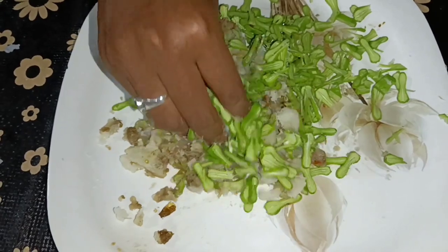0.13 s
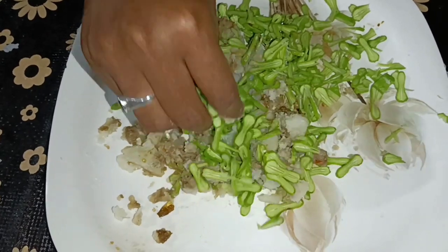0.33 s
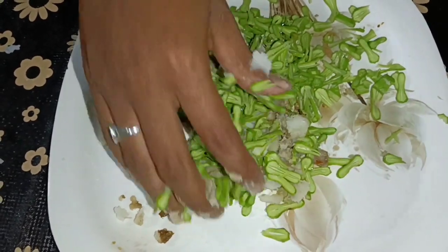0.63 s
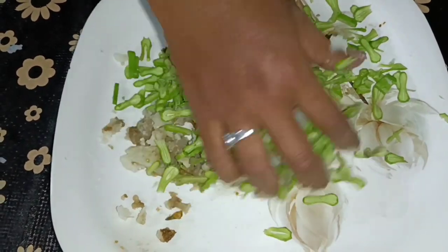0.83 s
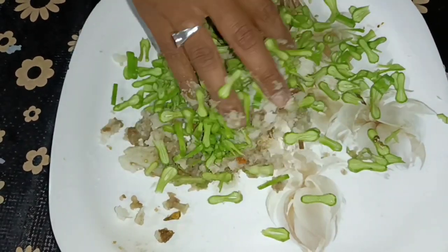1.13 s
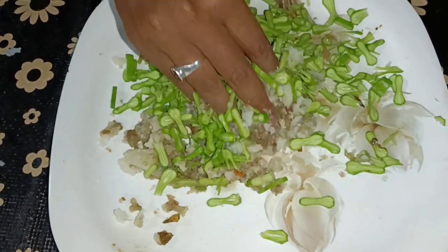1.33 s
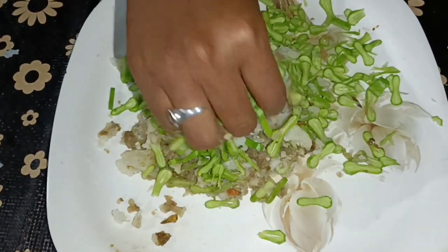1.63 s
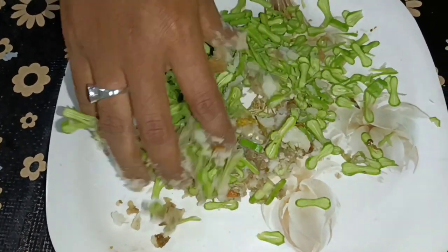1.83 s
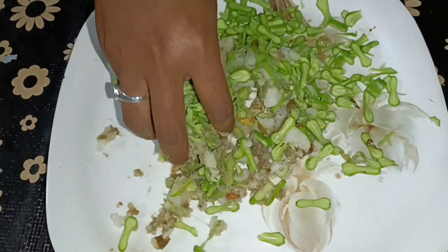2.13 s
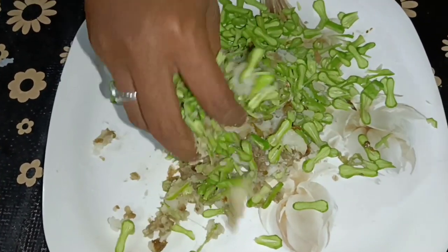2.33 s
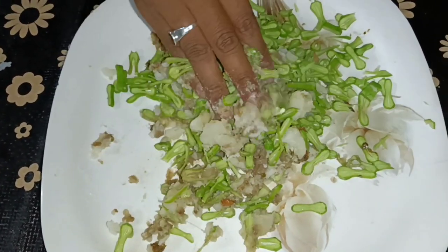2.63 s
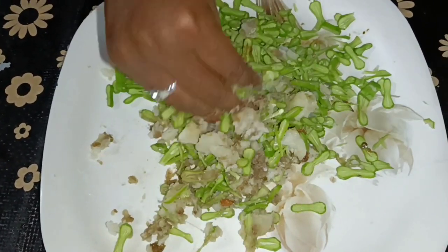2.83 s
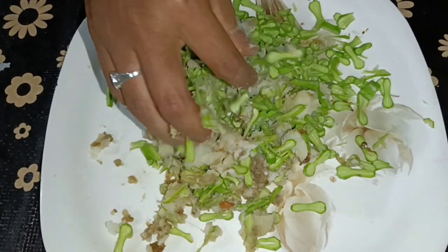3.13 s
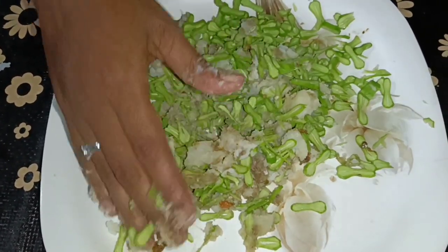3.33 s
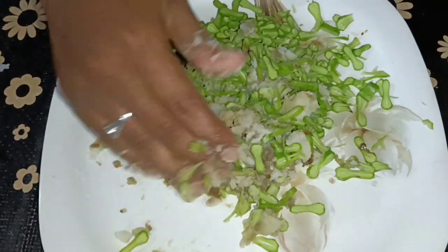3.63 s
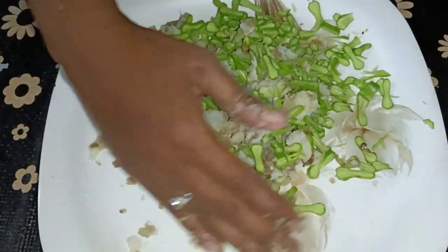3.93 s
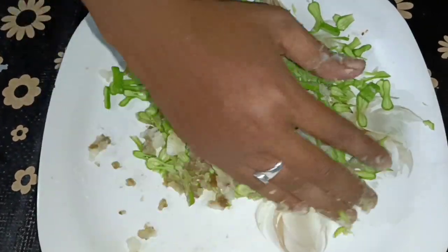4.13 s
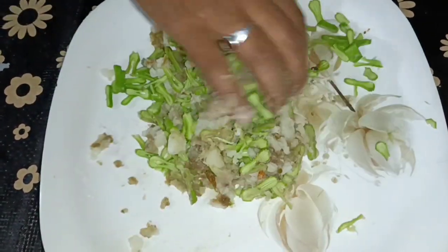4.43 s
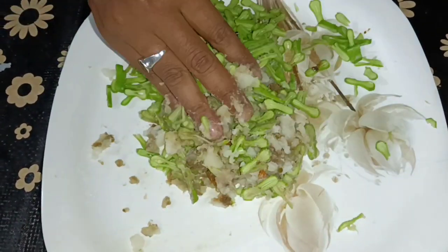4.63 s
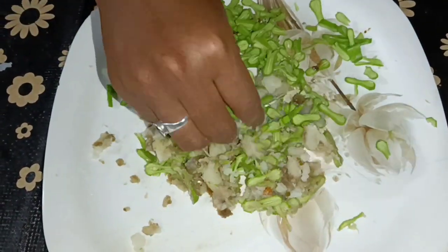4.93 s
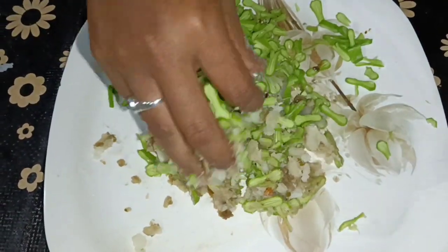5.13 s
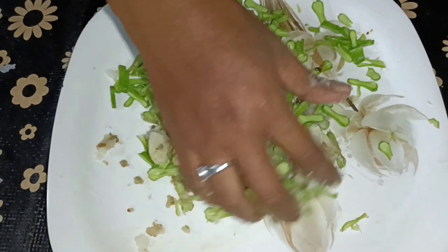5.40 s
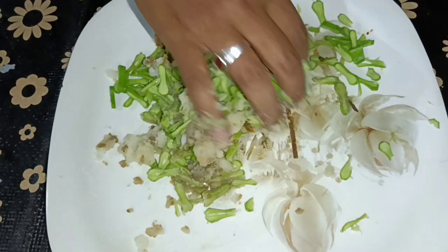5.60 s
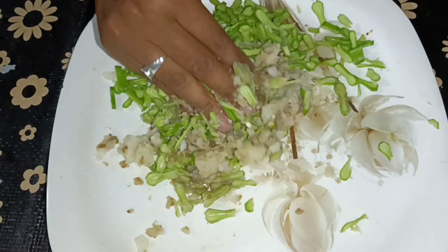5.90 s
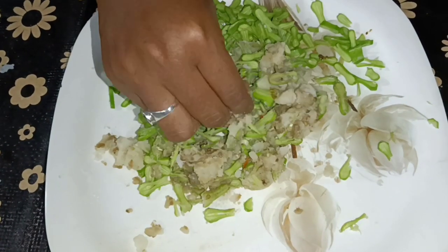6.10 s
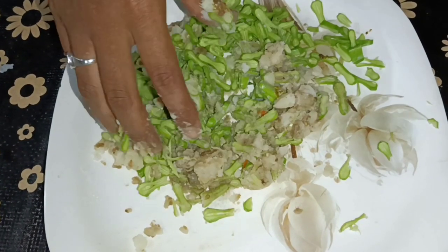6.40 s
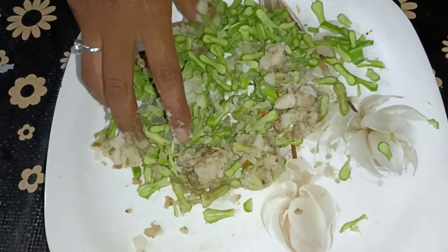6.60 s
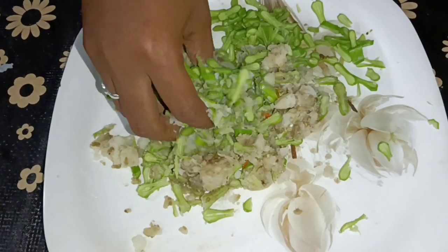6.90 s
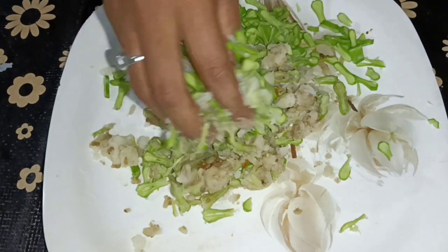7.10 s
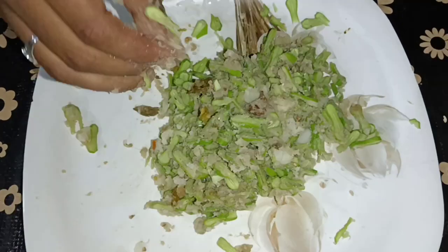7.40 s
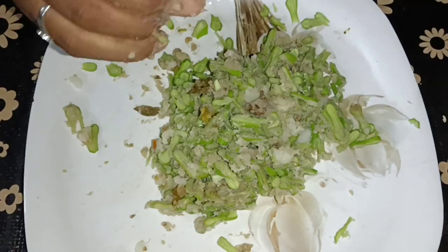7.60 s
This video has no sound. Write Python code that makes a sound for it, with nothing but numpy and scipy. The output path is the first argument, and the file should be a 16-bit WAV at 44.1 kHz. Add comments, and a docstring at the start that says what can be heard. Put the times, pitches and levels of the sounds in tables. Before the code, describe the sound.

Close, crisp vegetable crunching and rustling, fingers and a ring knocking a food-covered plate, low table thuds, hiss, and a faint motor at the end.

```python
"""Hand turning chopped vegetables on a plate

A hand squeezes and turns chopped raw vegetables, close to a small stereo camera in a kitchen; its left port is shaded.
Random slips of wet pieces crackle and scrape through the plate's resonances; bursts of noise and short pulses snap.
Fingertips and a ring tap the damped plate and the plate thuds on the covered table, both as sums of decaying modes.
Shaped noise hisses under it all; after a cut near the end the background has a faint motor's rush, hum and whine."""
import sys
import numpy as np
from scipy import signal
from scipy.fft import rfft, irfft, next_fast_len
from scipy.io import wavfile
from scipy.ndimage import map_coordinates

SR = 44100
rng = np.random.default_rng(int(sys.argv[2]) if len(sys.argv) > 2 else 0)


def bounce(signal):
    """Save signal as a 16-bit WAV file at the path given by the first command-line argument."""
    frames = np.transpose(np.atleast_2d(signal))
    limited = np.clip(frames, -1, 1)
    pcm = np.round(limited * 32767).astype(np.int16)
    wavfile.write(sys.argv[1], SR, pcm)


N = 341775  # samples

# Modes of the plate, damped by the food on it. Each row: centre in Hz, width in Hz, relative level in dB.
PLATE_MODES = [(732, 205, -1.5), (968, 294, -3), (1499, 243, 0), (2077, 129, 3), (2437, 710, -3.5),
               (3550, 1140, -4.5)]
# Colour of crisp pieces breaking and rubbing. Each row: frequency in Hz, gain in dB.
CRISP_COLOUR = [(900, -23), (1800, -5.5), (2800, 0), (3800, 3), (5000, 2), (6100, 6.5), (7400, 1.5),
                (9000, -10), (15000, -16)]


def amp(db):
    """Decibels to gain."""
    return 10 ** (np.asarray(db) / 20)


def unit(x):
    """Scaled to rms 1."""
    return x / np.sqrt(np.mean(x ** 2) + 1e-20)


def along(points, hz):
    """(Hz, value) points read on a log frequency axis."""
    f, v = np.transpose(points)
    return np.interp(np.log(hz + 1), np.log(f), v)


def curves(rows):
    """One value per sample for each column after the time."""
    s, *cols = np.transpose(rows)
    return [np.interp(np.arange(N) / SR, s, c) for c in cols]


def wobble(rate):
    """A smooth random curve, rate knots a second."""
    knots = rng.standard_normal(int(N * rate / SR) + 4)
    return map_coordinates(knots, [np.arange(N) * rate / SR])


def filtered(x, response):
    """x times a complex response of frequency."""
    m = next_fast_len(N + SR // 2)
    return irfft(rfft(x, m) * response(np.fft.rfftfreq(m, 1 / SR)), m)[..., :N]


def coloured(x, spectrum):
    """x shaped by (Hz, dB) points."""
    return filtered(x, lambda hz: amp(along(spectrum, hz)))


def high_pass(x, corner_hz):
    """Causal bass cut."""
    return signal.sosfilt(signal.butter(N=3, Wn=corner_hz, btype="high", fs=SR, output="sos"), x)


def add(track, s, sound):
    """Mix a sound into the track at time s."""
    part = track[..., max(round(s * SR), 0):][..., :sound.shape[-1]]
    part += sound[..., :part.shape[-1]]


def favour(hz, pitch_hz, spread_octaves):
    """Weight that falls away on both sides of a pitch."""
    return 1 / (1 + (np.log2((hz + 1) / pitch_hz) / spread_octaves) ** 2)


def swell(s, half_s):
    """Bell-shaped rise and fall around time s."""
    t = np.arange(N) / SR
    return np.exp(-((t - s) / half_s) ** 2 / 2)


def resonance(hz, centre_hz, width_hz):
    """Response of one damped mode."""
    return 1j * hz * width_hz / (centre_hz ** 2 - hz ** 2 + 1j * hz * width_hz)


def plate(hz):
    """Response of the plate: its damped modes summed with alternating sign."""
    return sum((-1) ** k * amp(db) * resonance(hz, c, w) for k, (c, w, db) in enumerate(PLATE_MODES))


def grains(rate, spread_db, scatter_s):
    """Tiny impulses of uneven size, each from its own spot, so the two ports get it at different times."""
    count = int(rate * N / SR)
    when = rng.uniform(0, N, count)
    size = amp(spread_db * np.minimum(rng.exponential(size=count), 5)) * rng.choice([-1, 1], count)
    lag = rng.normal(0, scatter_s * SR, count)
    return unit(np.array([np.bincount(at.astype(int) % N, size, N) for at in (when + lag, when)]))


def hand(range_db=25.5, rest_squeeze_db=-49.5, rest_press_db=-49):
    """Squeeze on the pieces and press on the plate in dB: strokes swell, hold and die away over a restless floor."""
    # The hand digs in, bears down and lets go. Each row: time of full force in seconds, rise, hold and
    # release in seconds, squeeze on the pieces in dB, press on the plate in dB.
    strokes = [(-0.004, 0.063, 0.033, 0.23, -34, -32), (0.152, 0.12, 0.13, 0.15, -31, -36.5),
               (0.359, 0.092, 0.0086, 0.31, -29, -34.5), (0.85, 0.013, 0.07, 0.52, -30.5, -26),
               (0.994, 0.22, 0.049, 0.13, -20, -27), (1.385, 0.097, 0.0096, 0.12, -23.5, -25.5),
               (1.574, 0.29, 0.013, 0.17, -25.5, -33), (2.028, .012, 0.0072, 0.11, -37, -24),
               (2.105, .012, 0.079, 0.27, -26.5, -30.5), (2.6, 0.022, 0.0095, 0.23, -30.5, -31.5),
               (2.857, 0.19, .01, 0.13, -28, -30.5), (3.024, 0.17, 0.0034, 0.17, -23, -26),
               (3.63, 0.016, 0.0098, 0.077, -25.5, -35), (3.983, 0.17, .015, 0.58, -32, -34.5),
               (4.445, 0.23, 0.057, 0.15, -17, -36), (4.83, 1, 0.013, 0.33, -37.5, -40),
               (4.955, 0.36, 0.08, 0.14, -29.5, -36.5), (5.438, 0.014, 0.15, 0.26, -28, -27.5),
               (6.041, 0.77, 0.18, 0.084, -33, -38), (6.854, 0.79, 0.074, 0.25, -32, -37)]
    t = np.arange(0, N, 32) / SR  # one value per 32 samples
    s, rise_s, hold_s, release_s, squeeze_db, press_db = np.transpose(strokes)[:, :, None]
    slack = np.maximum(s - t, 0) / rise_s + np.maximum(t - s - hold_s, 0) / release_s

    def total(db, rest_db):
        """Power sum of all strokes; each changes by range_db over its rise and over its release."""
        power = amp(rest_db) ** 2 + np.sum(amp(db - range_db * slack) ** 2, axis=0)
        return 10 * np.log10(power)

    return curves(np.transpose([t, total(squeeze_db, rest_squeeze_db), total(press_db, rest_press_db)]))


def rubbing(rate=650, spread_db=2.5, shift_db=3.5, drift_s=0.001599):
    """Slips sound the plate; the moving load damps now one mode, now another, and bends their pitch."""
    slips = grains(rate, spread_db, scatter_s=.0001)
    ringing = 0
    for k, (c, w, db) in enumerate(PLATE_MODES):
        level = (-1) ** k * amp(db + shift_db * wobble(20))
        ringing = ringing + level * filtered(slips, lambda hz: resonance(hz, c, w))
    n = np.arange(N)
    bent = n + drift_s * SR * wobble(20)  # a drifting read position bends the pitch
    return unit(np.array([np.interp(bent, n, port) for port in ringing]))


def mixing(squeeze, press, crunch_db=0, crackle_db=-5, rub_db=-2, clump_db=1.5, lurch_db=1.2,
           shake_follow=0.67, shake_db=-14.5):
    """Crisp pieces slide in clumps and crackle singly; slips sound the plate, the hand's weight shakes the table."""
    # Colour of the shaken table. Each row: frequency in Hz, gain in dB.
    rumble_colour = [(25, -30), (60, -9.5), (100, -5.5), (160, -0.5), (240, -4), (340, -13.5), (520, -17.5),
                     (1200, -31)]
    clumps = clump_db * wobble(70)
    crunch = unit(coloured(grains(rate=8000, spread_db=2.6, scatter_s=.0001), CRISP_COLOUR))
    crackle = unit(coloured(grains(rate=220, spread_db=0.5, scatter_s=.0001), CRISP_COLOUR))
    rumble = unit(coloured(grains(rate=900, spread_db=2.5, scatter_s=0.00025), rumble_colour))
    pieces = crunch * amp(squeeze + crunch_db + clumps) + crackle * amp(squeeze + crackle_db)
    rub = rubbing() * amp(press + rub_db + clumps)
    # the table follows the press over a narrower range
    shake = rumble * amp(shake_follow * press + shake_db + lurch_db * wobble(30))
    return pieces + rub + shake


def crumbs(press, rate=14, level_db=-35, follow=0.77, soft_hz=1050):
    """Single pieces drop back on the plate with soft ticks, louder when the hand presses harder."""
    drops = np.zeros(N)
    count = int(rate * N / SR)
    when = rng.integers(0, N, count)
    drops[when] = rng.uniform(-1, 1, count)
    ticks = unit(filtered(drops, lambda hz: plate(hz) * favour(hz, soft_hz, 1)))
    return ticks * amp(follow * press + level_db)


def sweeps(spread_octaves=0.26):
    """Fast sliding packs the slips into a swish around one pitch."""
    # Quick sweeps of the fingers through the pile. Each row: middle in seconds, half length in seconds,
    # level in dB, centre in Hz.
    finger_sweeps = [(1.018, 0.043, -21.5, 3630), (4.433, 0.026, -11.5, 3900), (4.448, 0.033, -13.5, 5730),
                     (6.935, 0.0094, -19.5, 5640)]
    out = np.zeros((2, N))
    slips = grains(rate=5000, spread_db=1.5, scatter_s=.0001)
    for s, half_s, db, hz in finger_sweeps:
        swish = unit(filtered(slips, lambda f: favour(f, hz, spread_octaves) ** 1.33))
        out += swish * amp(db) * swell(s, half_s)
    return out


def scrapes(judder_db=1.0, spread_octaves=0.5):
    """Pieces stick and slip on the glaze; the uneven slips ring the plate's modes near one pitch."""
    # Pieces dragged across the plate. Each row: middle in seconds, half length in seconds,
    # level in dB before the judder, pitch that rings most in Hz.
    drags = [(0.932, 0.023, -21, 2400), (2.146, 0.031, -28, 1820), (2.764, 0.031, -43, 616),
             (3.01, 0.023, -30.5, 1900), (3.996, 0.027, -28, 2880), (4.457, 0.04, -23, 2100),
             (4.487, 0.049, -36.5, 835), (4.819, 0.014, -34, 845), (5.52, 0.034, -33, 1900),
             (6.54, 0.011, -36, 2200), (6.744, 0.038, -36, 1900)]
    out = np.zeros((2, N))
    ringing = rubbing()
    for s, half_s, db, hz in drags:
        scrape = unit(filtered(ringing, lambda f: favour(f, hz, spread_octaves) ** 2))
        out += scrape * amp(db) * swell(s, half_s)
    return out * amp(judder_db * wobble(110))


def cracks(level_db=4.0, t60=0.0018, crumble_db=-15, crumble_t60=0.014):
    """A stalk lets go at once: one sharp pulse of a few cycles, then the torn fibres crumble briefly."""
    # Crisp stalks breaking under the fingers. Each row: start in seconds, relative level in dB, centre in Hz.
    stalks = [(0.1628, -2.5, 6130), (0.8293, -4, 4670), (1.512, -3.5, 5700), (2.8518, 0.5, 5260),
              (4.8165, -6, 5600), (4.9555, -6, 5400), (4.9952, -6, 4800), (5.4375, 2, 5400),
              (6.0473, -4, 6300), (6.7718, -9, 4830)]
    pulses, fibres = np.zeros(N), np.zeros((2, N))
    t = np.arange(SR // 20) / SR
    for s, db, centre_hz in stalks:
        add(pulses, s, amp(db + level_db - 60 * t / t60) * np.sin(2 * np.pi * centre_hz * t))
        add(fibres, s, amp(db + crumble_db - 60 * t / crumble_t60) * rng.standard_normal((2, len(t))))
    return coloured(pulses + fibres, CRISP_COLOUR) / 2


def taps(spread_octaves=0.2, snap_t60=0.015, snap_db=6, ring_db=-2, ring_t60=0.016, attack_s=0.0011,
         contact_s=0.0027, focus=0.59, knock_db=-5, knock_hz=680, knock_t60=0.0042):
    """Each contact favours plate modes near one pitch, and a piece snaps under it; low ones add a dull knock."""
    # Contacts with the plate. Each row: start in seconds, relative level in dB, pitch that rings most in Hz,
    # crisp snap in dB relative to the contact.
    contacts = [(0.02, -4.5, 2350, -15), (0.057, -16, 1080, -22), (0.1628, -16.5, 1990, -7),
                (0.251, -12, 1560, -18), (0.322, -18, 1480, -5.5), (0.596, -18, 2010, -16),
                (0.678, -12, 850, -24), (0.83, 1.5, 1490, -13.5), (0.8541, -7.5, 1560, -5.5),
                (0.935, -8, 1560, -6.5), (0.986, -8.5, 1476, -23), (0.994, -8.5, 3100, -9),
                (1.057, -12.5, 905, -2), (1.146, -21, 905, -22), (1.18, -14, 1060, -19),
                (1.569, -11, 2790, -11), (1.992, -14, 1540, -8.5), (2.0255, -3.5, 1480, -28),
                (2.029, -3, 1180, -31), (2.037, -10.5, 1800, -5.5), (2.1, -11.5, 2090, -6),
                (2.6, -1, 1840, -30), (2.611, -15, 3940, -0.5), (2.8268, -17.5, 740, -2),
                (2.8285, -5.5, 2030, -28), (2.853, -9, 1590, -13), (3.029, -10, 1610, -5.5),
                (3.073, -10.5, 1190, -22), (3.215, -27, 654, -20), (3.322, -28, 855, -20),
                (3.36, -25.5, 1000, -22), (3.949, -12, 2390, -8), (3.991, -6, 1570, -17),
                (4.001, -10, 1500, -15), (4.712, -12, 1090, -26), (4.962, -21.5, 704, 5),
                (5.437, 4, 1430, -13), (5.464, -7, 1460, -6), (5.574, -15, 1500, -3),
                (5.672, -18, 1150, -25), (5.792, -21.5, 1010, -25), (6.047, -17, 910, -9),
                (6.468, -20, 2890, -6), (6.514, -12, 2130, -16), (6.521, -6.5, 2200, -13),
                (6.688, -14.5, 2060, -15), (6.77, -12, 1450, -16.5), (6.865, -8.5, 1720, -20),
                (7.061, -10, 1230, -30), (7.167, -18.5, 1480, -13.5)]
    # Colour of the snaps. Each row: frequency in Hz, gain in dB.
    snap_colour = [(500, -7.5), (2000, 4.5), (3700, 15.5), (4800, 3), (6500, 7.5), (8000, -5), (15000, -16)]
    rings, snaps = np.zeros((2, N)), np.zeros((2, N))
    t = np.arange(SR // 10) / SR
    hz, width, mode_db = np.transpose(PLATE_MODES)[:, :, None]
    # after the contact the ring is smothered; ring_t60 is that of the narrowest mode
    fade = amp(-60 * np.maximum(t - contact_s, 0) / ring_t60 * width / width.min())
    for s, db, pitch_hz, crisp_db in contacts:
        onset = 1 - np.exp(-t * (1 + 2 * amp(db)) / attack_s)  # flesh and food cushion a light contact most
        spread = spread_octaves * (1 + amp(db) / 2)  # a hard blow wakes more modes of the plate
        weight = amp(mode_db + rng.normal(0, 2.2, hz.shape)) * favour(hz, pitch_hz, spread) ** focus
        tuned = hz * (1 + rng.normal(0, .02, hz.shape))  # the shifting load of food detunes the plate a little
        phase = rng.uniform(0, 2 * np.pi, hz.shape)
        phase = phase + rng.normal(0, 1, (2, *hz.shape)) * hz / 2500  # the ports differ more at high pitches
        ring = onset * np.sum(weight * np.sin(2 * np.pi * tuned * t + phase) * fade, axis=1)
        add(rings, s, amp(db + ring_db) * ring / np.abs(ring).max())
        knock = amp(db + knock_db - 60 * t / knock_t60) * np.sin(2 * np.pi * knock_hz * t)
        add(rings, s, onset * favour(knock_hz, pitch_hz, 1) * knock)
        snap = amp(db + crisp_db + snap_db - 60 * t / snap_t60) * rng.standard_normal((2, len(t)))
        add(snaps, s, onset * snap)
    return rings + coloured(snaps, snap_colour)


def thuds(level_db=-3, attack_s=0.0041, lag_s=0.003, spread_octaves=0.46, spread_grows=1.15, focus=1.03):
    """The loaded plate gives way and bumps the table: a few low modes, quickly spent."""
    # The plate pushed against the table. Each row: time of the push in seconds, relative level in dB,
    # pitch that booms most in Hz.
    pushes = [(0.059, -19, 153), (0.669, -21, 232), (0.826, -7, 160), (0.855, -17.5, 209),
              (0.986, -19, 166), (1.68, -22, 293), (1.913, -20, 153), (2.099, -8.5, 154), (2.153, -19, 179),
              (2.223, -18.5, 190), (3.01, -20.5, 81), (3.027, -12.5, 292), (4.391, -17.5, 158),
              (4.801, -25.5, 149), (5.438, -2.5, 149), (5.515, -21.5, 213), (6.636, -18.5, 149),
              (6.688, -16.5, 126)]
    # Modes of plate and table together. Each row: frequency in Hz, relative level in dB, t60 in seconds.
    table_modes = [(68.4, 3, 0.16), (150.9, 0.5, 0.11), (224, 0, 0.12), (286, -0.5, 0.083)]
    out = np.zeros(N)
    t = np.arange(SR // 3) / SR
    hz, mode_db, t60 = np.transpose(table_modes)[:, :, None]
    for s, db, pitch_hz in pushes:
        tuned = hz * rng.normal(1, .04, hz.shape)
        spread = spread_octaves * (1 + spread_grows * amp(db))  # a hard bump wakes more modes
        weight = favour(hz, pitch_hz, spread) ** focus
        modes = weight * amp(mode_db - 60 * t / t60) * np.sin(2 * np.pi * tuned * t)
        ring = modes.sum(0) * (1 - np.exp(-t / attack_s))
        add(out, s + lag_s, amp(db + level_db) * ring / np.abs(ring).max())
    return out


def kitchen(x):
    """The room's short answer: decaying noise, different at each port, the treble dying by its own t60."""
    # Decay of the room. Each row: frequency in Hz, t60 in seconds.
    decay = [(1500, 0.52), (10000, 0.043)]
    hz, t, z = signal.stft(rng.standard_normal((2, SR // 3)), SR, nperseg=256)
    tail = signal.istft(z * amp(-60 * t / along(decay, hz)[:, None]), SR, nperseg=256)[1]
    tail = np.pad(tail / np.linalg.norm(tail[0]), ((0, 0), (SR // 400, 0)))  # the room answers 2.5 ms late
    return signal.fftconvolve(x, tail, axes=1)[:, :N]


def surroundings(x, room_db=-13):
    """Close echoes and the kitchen's tail colour the mids and treble; the bass arrives direct."""
    # Table top, hand and camera body throw the sound back. Each row: delay in seconds, gain as a factor.
    near_echoes = [(.0017, 0.12), (0.0098, 0.15), (0.0136, 0.16)]
    bright = high_pass(x, corner_hz=458)
    echoes = filtered(bright, lambda hz: sum(gain * np.exp(-2j * np.pi * hz * delay)
                                             for delay, gain in near_echoes))
    return echoes + amp(room_db) * kitchen(bright)


def motor(cut_s=7.37, rush_db=-38.5, hum_db=-42, whine_db=-45, hum_hz=107.7):
    """A distant motor behind the last moments: low rush, wavering hum, fluttering whine of narrow noise bands."""
    # Colour of the rush. Each row: frequency in Hz, gain in dB.
    rush_colour = [(30, -22), (103, -4), (291, -15.5), (367, -29), (667, -23), (1240, -28.5), (3000, -33),
                   (5500, -110)]
    # Bands of the whine. Each row: centre in Hz, width in Hz, relative level in dB.
    whine_bands = [(1260, 66, 6), (2460, 140, -3), (5000, 55, -4)]
    t = np.arange(N) / SR
    rush = unit(coloured(rng.standard_normal(N), rush_colour))
    hum = unit(np.sin(2 * np.pi * hum_hz * t + .5 * wobble(11)))

    def bands(f):
        """Sum of the steep-sided whine bands."""
        return sum(amp(db) / (1 + ((f - hz) / width * 2) ** 4) for hz, width, db in whine_bands)

    whine = unit(filtered(rng.standard_normal(N), bands))
    after_cut = np.clip((t - cut_s) / 0.013, 0, 1)  # the cut to this background takes 13 ms
    return after_cut * (amp(rush_db) * rush + amp(hum_db) * hum + amp(whine_db) * whine)


def hiss(level_db=7, ripple_db=-5):
    """Noise of drifting level, with a bright hump on the right and a fine fixed ripple in its colour."""
    # Course of the hiss. Each row: time in seconds, level in dB before level_db is added.
    drift = [(0, -38.5), (.6, -43), (1.28, -42.5), (1.7, -35), (4.85, -36), (5.6, -39.5), (6.25, -36.5),
             (6.65, -40), (6.99, -34), (7.45, -38.5)]
    # Colour of the hiss at each port. Each row: frequency in Hz, gain in dB.
    left_colour = [(300, -5.5), (1000, -14.5), (3000, -11.5), (5500, -17), (6600, -5.5), (8500, -14.5),
                   (11500, -0.5), (13000, -4.5)]
    right_colour = [(300, -4.5), (1000, -18), (3150, -3), (4000, -7), (5500, 0), (6400, 10.5), (7500, 10),
                    (8700, -1.5), (11000, -1.5), (13000, -6.5), (15000, -3.5)]
    ports = np.array([coloured(rng.standard_normal(N), colour) for colour in (left_colour, right_colour)])
    rippled = unit(ports + amp(ripple_db) * kitchen(ports))
    return rippled * amp(curves(drift)[0] + level_db)


def scene():
    """Plate and food in the room, heard by a shaded left port and an open right one."""
    # Shading of the left port. Each row: frequency in Hz, gain in dB.
    shade = [(1400, 0.5), (2200, -5), (3200, -8), (4500, -15.5), (7000, -19), (9000, -11), (12000, 1.5)]
    squeeze, press = hand()
    near = mixing(squeeze, press) + crumbs(press) + sweeps() + scrapes() + cracks() + taps() + thuds()
    left, right = near + surroundings(near)
    return np.array([coloured(left, shade), right]) + hiss() + motor()


def record(dry):
    """The camera cuts the deep bass, clips at full scale and then keeps nothing above its band limit."""
    clipped = np.clip(high_pass(dry, corner_hz=43.7), -1, 1)
    return filtered(clipped, lambda hz: hz < 15600)


dry = scene()
out = record(dry)
bounce(out)
```